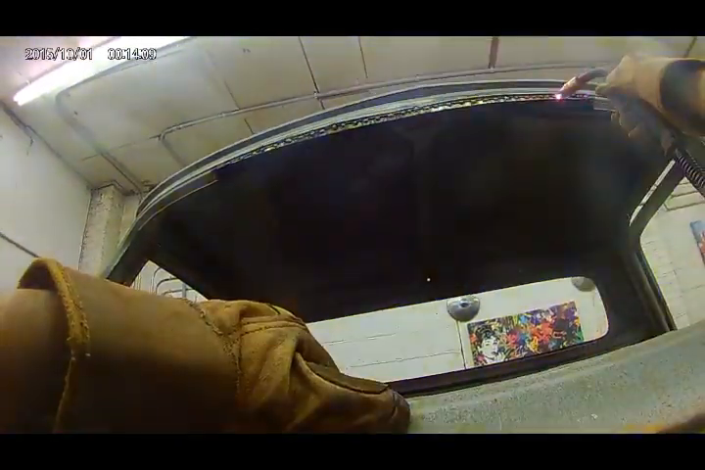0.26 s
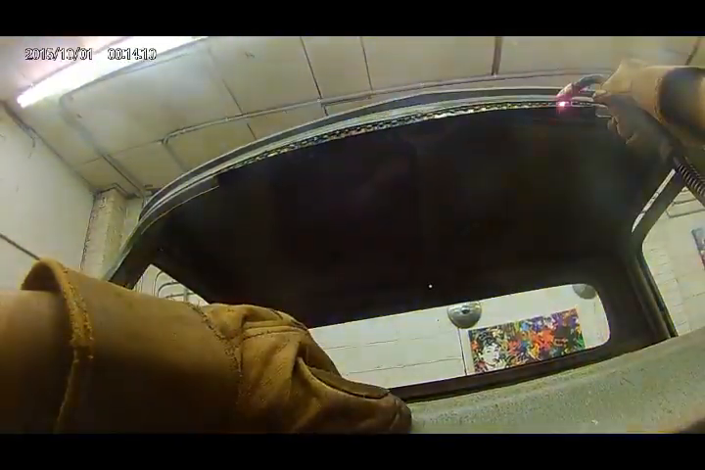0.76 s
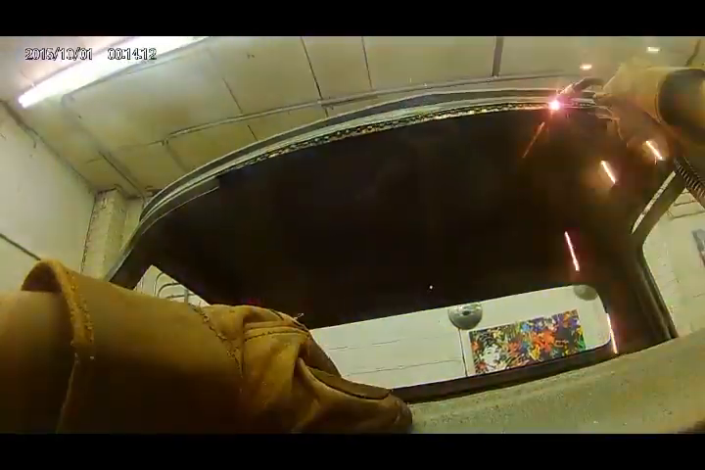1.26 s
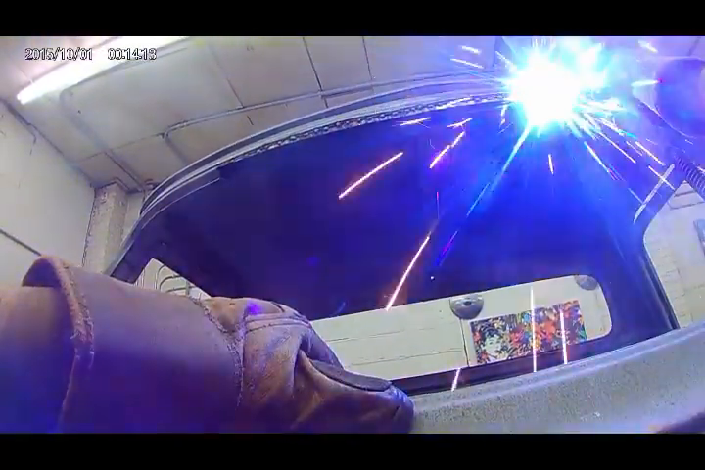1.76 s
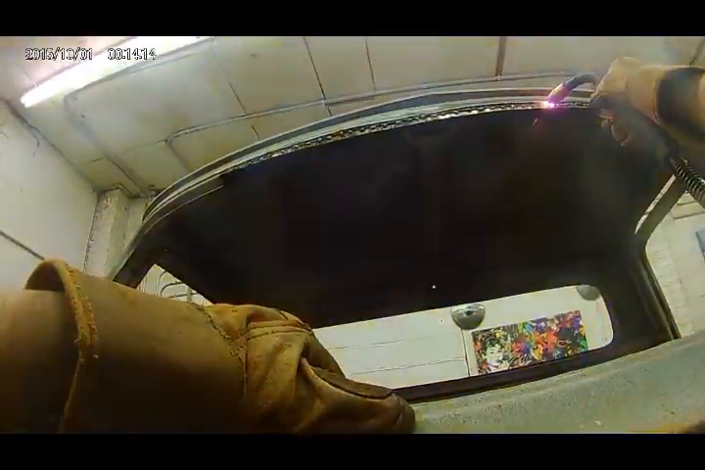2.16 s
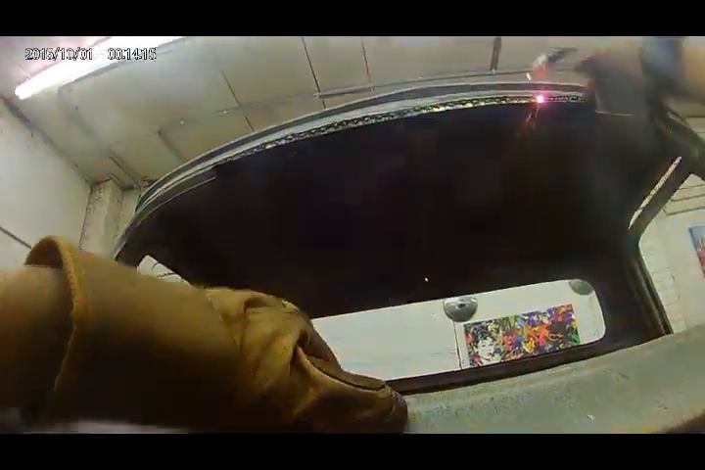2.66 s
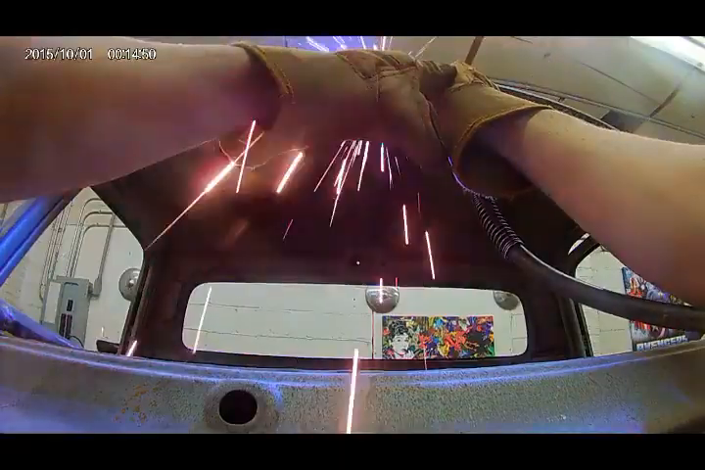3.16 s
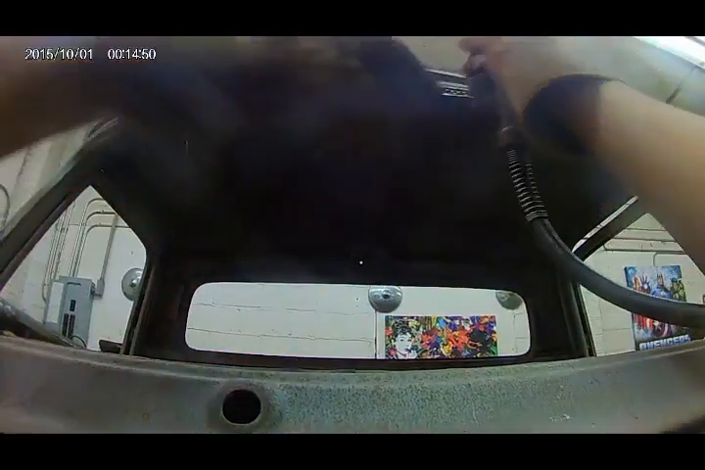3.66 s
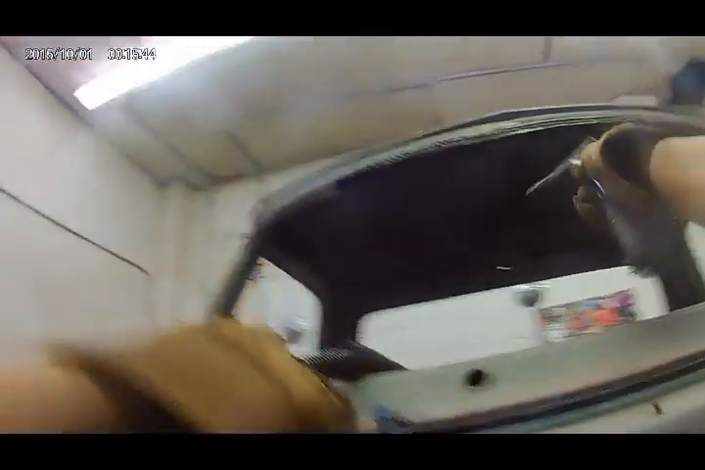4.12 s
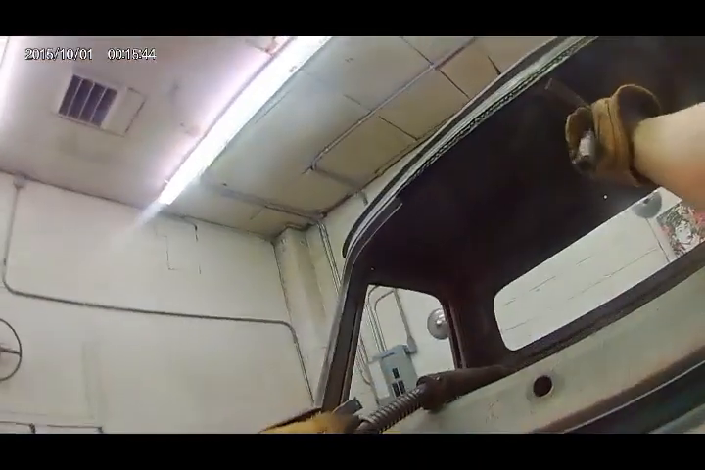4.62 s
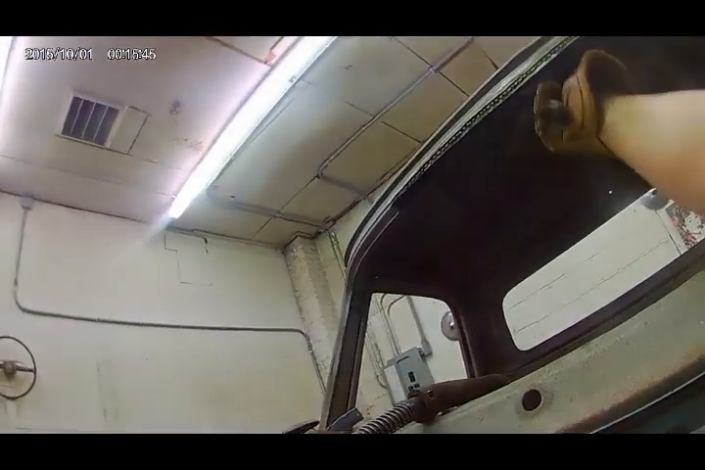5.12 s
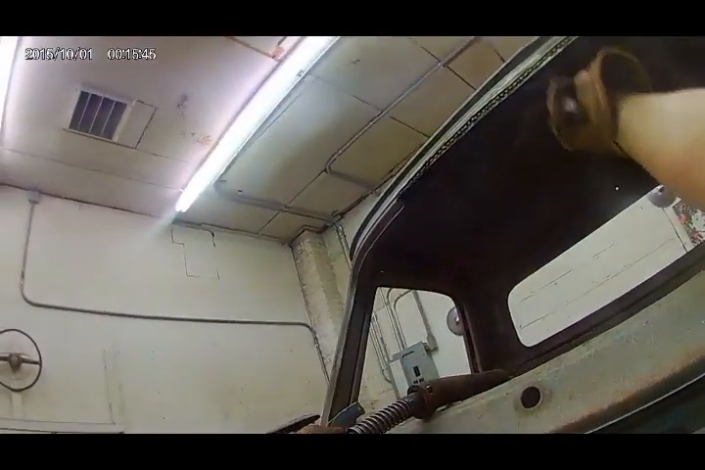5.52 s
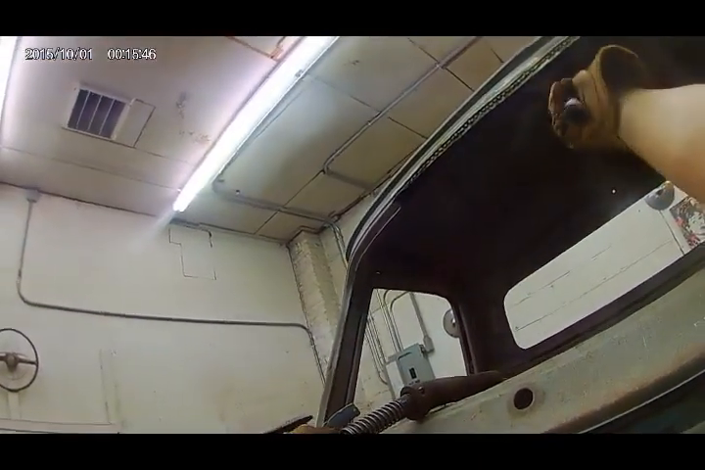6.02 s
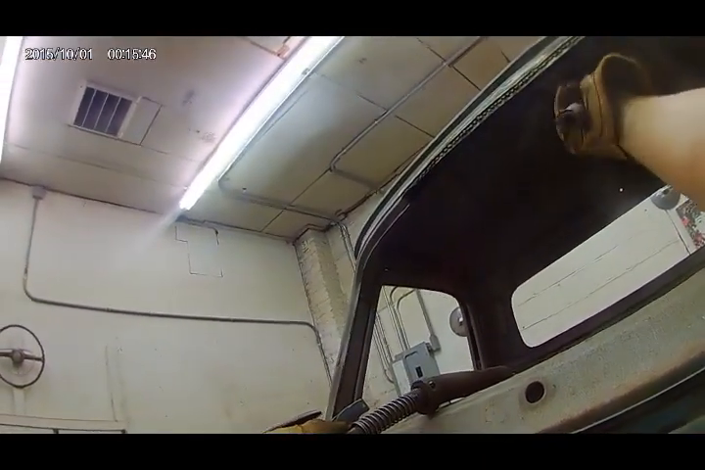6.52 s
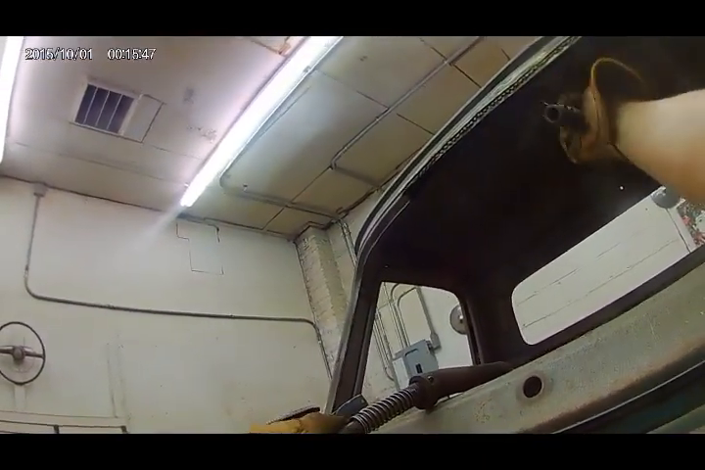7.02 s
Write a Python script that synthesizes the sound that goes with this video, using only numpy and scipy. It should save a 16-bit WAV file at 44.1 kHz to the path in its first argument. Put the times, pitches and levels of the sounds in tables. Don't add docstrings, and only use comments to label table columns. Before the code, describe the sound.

Heard close from a small boxed camera on a welder's helmet: five brief, harsh, sputtering arc bursts with sharp snaps, the last longest and loudest, broken by a hard metallic clank. Gloves then rub and knock the case. After a quiet pause, six steady hammer blows bang on sheet metal, growing stronger and echoing through a large hard-walled shop, over faint fan hum, hiss and thin electronic whine.

```python
import sys
import numpy as np
from scipy import signal
from scipy.fft import rfft, irfft
from scipy.io import wavfile
from scipy.ndimage import uniform_filter1d

SR = 44100
rng = np.random.default_rng(int(sys.argv[2]) if len(sys.argv) > 2 else 0)


def digitize_waveform(pressure):
    field = np.atleast_2d(pressure).T
    bounded = np.clip(field, -1, 1)
    quanta = np.round(bounded * 32767).astype(np.int16)
    wavfile.write(sys.argv[1], SR, quanta)


def natural_amplitude(level_db):
    exponent = np.asarray(level_db, float) / 20
    return 10 ** exponent


N = 321048
T = np.arange(N) / SR
LEAN_S = 2.7
BRIGHT_S = 3.4

# start_s, length_s, sizzle_db, quench_t60_s, afterglow_t60_s
ARC_SPELLS = [
    (0.3, 0.22, -33, 0.092, 0.42),
    (0.896, 0.018, -43, 0.15, 0.23),
    (0.985, 0.032, -44, 0.084, 0.27),
    (1.076, 0.11, -36, 0.13, 0.42),
    (1.639, 0.18, -46, 0.18, 0.8),
    (2.269, 0.2, -49, 0.11, 0.6),
    (2.769, 0.35, -33, 0.61, 1.35),
]
# start_s,
# snap_db, flare_db, flare_half_length_ms
WIRE_SHORTS = [(0.3177, -15.5, -50, 5), (0.3303, -14, -44, 4.3), (0.343, -31, -22, 10),
               (0.3834, -13.5, -42, 5), (0.392, -17, -36, 7.1), (0.421, -17, -22, 13),
               (0.4606, -17.5, -23, 11), (0.491, -16, -21, 9), (0.533, -17, -35, 5), (.543, -26, -40, 4),
               (0.9776, -24, -45, 4), (0.919, -10.5, -14.5, 15), (.951, -7, -38, 5), (1.0132, -17, -24, 12),
               (1.043, -17.5, -44, 4.2), (1.0724, -14.5, -19, 17), (1.11, -16.5, -41, 8.4),
               (1.131, -16, -24, 5), (1.142, -21, -46, 5), (1.1526, -15.5, -30, 7.8),
               (1.164, -21, -36, 5.9), (1.1823, -12.5, -24, 13), (1.653, -48, -20.5, 7.5),
               (1.6906, -17.5, -22, 36), (1.7312, -12.5, -26, 4.2), (1.766, -13, -19, 15),
               (1.803, -17, -22, 10), (1.825, -17.5, -26, 23), (1.8612, -16.5, -19, 5.5),
               (1.8704, -16, -22.5, 18), (1.899, -17.5, -29, 6.5), (1.909, -19, -42, 5),
               (2.286, -35, -25, 11), (2.3015, -13.5, -41, 5), (2.335, -30, -25, 15), (2.373, -17, -23, 4.8),
              (2.3795, -29, -36, 4), (2.405, -8.5, -23, 12.5), (2.4358, -14, -17, 2.9),
              (2.4713, -11, -30, 12), (2.5007, -19, -46, 4.4), (2.5222, -17.5, -45, 6),
              (2.762, -21, -24, 7.2), (2.822, -16, -42, 5), (2.8317, -9.5, -19, 9.4),
              (2.8474, -15, -31, 5.5), (2.8537, -12, -34, 5), (2.8632, -12, -27, 9.1), (2.874, -15, -34, 5),
              (2.8876, -3, -21.5, 25), (2.9048, -14, -38, 5), (2.9487, -12, -10.5, 3), (2.969, -9, -24, 5),
              (2.981, -19, -17.5, 5.2), (3.001, -7.5, -20.5, 11), (3.0318, -15, -31, 11),
              (3.0547, -11, -19, 7.4), (3.065, -17, -26, 6), (3.089, -18, -32, 3.7), (3.103, -24, -52, 5.7),
              (3.131, -3, -16, 4.8)]
# start_s, peak_db, low_share_db
SPATTER_HITS = [
    (0.6883, -51, -7),
    (1.4102, -43, -5),
    (1.4471, -44, 25),
    (1.5618, -45, -14),
    (4.6114, -40, -12),
]
# pitch_hz, width_hz, level_db
FLOOR_PAN_RINGS = [(4400, 250, 11), (6200, 150, 18.5)]
# pitch_hz, density_db_per_hz
ARC_SIDE_SPECTRUM = [(200, -18.5), (400, -17), (1100, -19.5), (1400, -2), (1750, -5), (2300, -10.5),
                     (2900, -23)]
# pitch_hz, density_db_per_hz
ARC_AHEAD_SPECTRUM = [(90, -79), (205, 6.5), (320, -9.5), (480, -16.5), (730, -5), (1150, -9), (1400, 4.5),
                      (2280, -5), (2750, -17)]
# pitch_hz, density_db_per_hz
RIM_SIDE_SPECTRUM = [(3500, -8), (4150, -4), (4600, -14), (5300, -4), (6000, -8), (6370, -3), (6800, -15),
                     (8800, -16), (9850, -5), (10600, -13), (11350, 1), (12600, -6), (13900, -21),
                     (14800, -14), (16000, -24)]
# pitch_hz, density_db_per_hz
RIM_AHEAD_SPECTRUM = [(1940, -37), (3300, -7), (3570, -12), (4050, 0), (4380, -3), (5170, -1), (5710, -8),
                      (6920, -11), (7790, -7), (8770, -14), (10100, -10), (11800, 1), (12900, -14),
                      (16000, -24)]
# pitch_hz, t60_s
CAB_DECAYS = [(500, 0.55), (2000, 0.27), (6000, 0.16), (14000, 0.011)]

# peak_s, force_db, rise_db_per_s, fall_db_per_s, drag_db
TORCH_CONTACTS = [
    (1.3, -3, 2800, 2800, -34),
    (2.727, -15.5, 1000, 1250, -47),
]
# pitch_hz, level_db, t60_s
CLANK_SHEET_MODES = [(437, -17, .3), (584, -22, .3), (680, -4, .28), (820, -12, .2), (965, -13, .08),
                     (1061, -18, .3), (1367, -3, .16), (1400, -4, .16), (1550, -6, .14), (1602, -9, .22),
                     (1700, -8, .22), (1790, -6, .1), (2140, -12, .09), (2445, -3, .08)]
# pitch_hz, level_db, t60_s
KNOCK_SHEET_MODES = [(108, -22, 1.8), (674, 9, 0.088), (780, 26, 0.065), (1030, 21, 0.05), (1570, 14, 0.08),
                     (4450, 2, 0.05)]
# pitch_hz, density_db_per_hz
CLANK_SPECTRUM = [(120, -54), (200, -31), (529, -11.5), (671, 2.5), (1100, -15), (1400, 7), (1770, -1.5),
                  (2050, -7), (2420, -7), (3020, -15.5), (6170, -23.5), (16000, -44)]
# pitch_hz, density_db_per_hz
KNOCK_SPECTRUM = [(47, -41), (80, -6), (422, -13), (1000, -1), (1280, -12), (1530, -4.5), (2220, -14),
                  (2970, -26.5), (4420, -12.5), (5280, -28), (12300, -37), (16000, -56)]

# start_s, strength_db, treble_db, bass_db
HAMMER_BLOWS = [
    (5.009, -14, 1, 7),
    (5.384, -9.5, 1.5, 6.5),
    (5.807, -7, -0.5, 6.5),
    (6.236, -6.5, -0.5, 7),
    (6.683, -5.5, 0, 5.5),
    (7.148, -6, -1, 5.5),
]
# start_s, peak_db, low_share_db
HAMMER_BOUNCES = [
    (5.016, -13.5, -0.5),
    (5.0444, -31, -20),
    (5.39, -9, -0.5),
    (5.458, -17.5, 5.5),
    (5.482, -17.5, 6),
    (5.5755, -20, -24),
    (5.624, -22, -22),
    (5.728, -25.5, -20),
    (6.721, -8, -18),
    (7.179, -6, -20),
]
# start_s, peak_db, pitch_hz
HAMMER_GLINTS = [(5.0102, -22, 11400), (5.0128, -23, 9700), (5.0228, -29, 4170), (5.049, -29, 5060),
                 (5.3835, -18, 11400), (5.3865, -17, 9500), (5.391, -12, 5000), (5.8068, -18, 11600),
                 (5.8098, -17, 9500), (5.814, -12, 4970), (5.819, -19, 4000), (6.2353, -20, 11400),
                 (6.239, -18, 9500), (6.243, -12, 4900), (6.262, -16, 4400), (6.685, -20, 11500),
                 (6.6825, -32, 4200), (6.6915, -13, 5050), (6.72, -11, 5100), (6.73, -12, 4500),
                 (7.148, -19, 11400), (7.1485, -21, 9800), (7.184, -10, 4800)]
# pitch_hz, density_db_per_hz
PANEL_SPECTRUM = [(15, -12), (25, -29.5), (161, -14.5), (200, -18.5), (344, -9.5), (427, -9), (695, -9.5),
                  (1190, -4.5), (1400, 4.5), (1520, -4), (2050, -7), (2690, -26.5), (4140, -25.5),
                  (11600, -47.5), (16000, -63)]
# pitch_hz, width_hz, level_db
PANEL_RESONANCES = [(210.5, 13.7, 13.5), (407, 20, -4.5), (420, 7.1, 4), (827.5, 4, 6), (1388, 85, 3.5),
                    (1970, 9.9, 3), (1680, 18, -1)]
# pitch_hz, width_hz, level_db
HOUSING_RESONANCES = [(4160, 230, 5.5), (6390, 79, 9), (10800, 170, -15), (12100, 1600, 14.5)]
# pitch_hz, t60_s
SHOP_DECAYS = [(60, 3.2), (160, 1.98), (420, 1.82), (1100, 1.15), (2910, 1.22), (7680, 1)]
# delay_s, level_db
WALL_ECHOES = [(0.028, -20), (0.045, -7), (0.074, -14), (.098, -14), (.124, -38)]
# start_s, length_s
TREBLE_GAPS = [
    (4.995, .011),
    (5.372, .009),
    (5.79, .012),
    (6.672, .009),
    (7.136, .007),
]

# start_s, hold_s, rumble_db, rustle_db, fall_t60_s
CASE_RUBS = [
    (.63, .005, -36.5, -42.5, 0.2),
    (3.422, 0.36, -43.5, -54.5, .1),
    (3.434, 0.016, -46, -32.5, .035),
    (3.563, .004, -57, -38, 0.19),
    (3.62, 0.092, -67, -38, 0.037),
    (3.708, 0.19, -26.5, -33.5, 0.019),
    (3.767, 0.0036, -15.5, -15.5, 0.062),
    (3.791, 0.021, -20, -31.5, 0.049),
    (3.856, 0.0042, -39, -38, 0.091),
    (4.618, 0.0081, -67, -36.5, 0.54),
]
# pitch_hz, density_db_per_hz
RUMBLE_SPECTRUM = [(12, -40), (20, -23), (228, 3.5), (303, -11.5), (365, 0.5), (451, -7.5), (535, -7),
                   (600, -23), (780, -39), (1320, -120)]
# pitch_hz, density_db_per_hz
RUSTLE_SPECTRUM = [(240, -10), (400, 0.5), (949, -4.5), (1040, -1), (1640, -4), (2220, -6), (3050, -31),
                   (3290, -16), (5860, -35.5), (10000, -38), (11700, -30), (13000, -48), (16000, -58)]
# start_s, peak_db, pitch_hz, t60_s, treble_db
CASE_TICKS = [(3.419, -30.5, 1940, 0.017, 11), (3.704, -0.5, 1830, 0.0099, -0.5),
              (3.757, -23.5, 2200, 0.056, 18.5), (3.82, -3.5, 1050, 0.038, -31),
              (3.875, -37, 1500, 0.041, -11), (3.895, -32, 1980, 0.0054, 21),
              (4.198, -25, 1500, 0.017, 18.5), (3.492, -39, 2110, .02, 5), (3.7235, -17, 2120, .04, 1),
              (3.7645, -8, 2200, 0.023, -2), (3.781, -9, 2120, 0.018, 0), (3.8, -14, 2210, 0.032, -2),
              (3.851, -27, 2190, .04, 0)]
# start_s, peak_db, pitch_hz, t60_s
CASE_THUDS = [
    (.622, -33, 108, 0.35),
    (2.728, -26, 108, 0.12),
    (3.433, -28, 68.5, 0.22),
    (3.563, -27, 560, 0.089),
    (3.703, -22, 218, 0.11),
    (3.821, -3, 231, 0.048),
    (3.876, -6, 108, 0.048),
]
# pitch_hz, density_db_per_hz
TICK_SPECTRUM = [(290, -37), (500, 11), (1960, 6), (2840, -6.5), (4350, -7.5), (6300, -28), (8500, -31),
                 (11700, -26), (15000, -45)]

# pitch_hz, density_db_per_hz
AIR_SPECTRUM = [(12, -50), (20, -17), (107, -16.5), (175, -20.5), (207, -10), (319, -21.5), (393, -3),
                (445, -27.5), (1150, -25.5), (1420, -23), (2200, -27.5), (2800, -44), (3640, -96)]
# pitch_hz, width_hz, level_db
FAN_WHISTLES = [(223, 27, -70), (405, 36, -55), (708, 93, -58), (1390, 140, -51.5)]
# pitch_hz, density_db_per_hz
HISS_SPECTRUM = [(1650, -50), (2800, -14), (3170, -6.5), (3560, -12), (3830, -4), (4950, -14.5),
                 (6720, -17.5), (6870, -13.5), (9960, -18.5), (11400, -9.5), (13000, -12), (13900, -12),
                 (14700, -15), (16000, -17)]
# pitch_hz, level_db
ELECTRONIC_WHINES = [(7117, -84), (12430, -71.5), (13329, -75.5), (13749, -71), (14217, -69.5)]


def arc():
    swell_db_per_s, strike_s, glow_db, glow_low_db = 5, 0.023, -44.5, 13
    flare_lag = 0.7
    flicker = natural_amplitude(1.97 * evened(uniform_filter1d(rng.standard_normal(N), size=200)))
    ahead = T > LEAN_S
    power, glow = np.zeros(N), np.zeros(N)
    for s, length, db, quench, t60 in ARC_SPELLS:
        swell_db = swell_db_per_s * np.clip(T - s, 0, length)
        power += natural_amplitude(db + swell_db) * stroke(s, length, strike_s, quench)
        glow += natural_amplitude(glow_db) * stroke(s + length, 0, quench, t60)
    crackle = natural_amplitude(-27) * grit(250, 2.4) * power

    relights = WIRE_SHORTS
    for s, _, flare_db, half_ms in relights:
        half = max(half_ms, 3) / 1000
        near = slice(int((s - .05) * SR), int((s + .08) * SR))
        power[near] += natural_amplitude(flare_db - 8.5) * np.exp(-((T[near] - s - flare_lag * half) / half) ** 2)
    fry = grit(20000, .8) * flicker
    flaring = split(fry, natural_amplitude(3.5 + 0.5 * ahead)) * power
    afterglow = split(fry, natural_amplitude(glow_low_db)) * glow

    pops = [(s, db, 1.5 - 6 * (s > LEAN_S)) for s, db, _, _ in relights]
    bridge_bursts = natural_amplitude(13.5) * snaps(pops, 0.00055)
    spatter = natural_amplitude(10.5) * lift(snaps(SPATTER_HITS, 0.0021), FLOOR_PAN_RINGS)
    drive = natural_amplitude(-4) * (flaring + afterglow) + crackle + bridge_bursts + spatter
    drive = drive + natural_amplitude(-12) * signal.oaconvolve(drive, room(CAB_DECAYS, .4))[:N]
    from_side = colour(drive * ~ahead, ARC_SIDE_SPECTRUM + RIM_SIDE_SPECTRUM)
    from_ahead = colour(drive * ahead, ARC_AHEAD_SPECTRUM + RIM_AHEAD_SPECTRUM[1:])
    return from_side + from_ahead


def torch_contact(contact, modes, noise_spectrum, ring_db, longest_t60, spread):
    s, force_db, rise, fall, drag_db = contact
    t = T[:SR // 2]
    impact = stroke(s, 0, 60 / rise, 60 / fall)
    shoulder = natural_amplitude(-9) * stroke(s, 0.0049, 0.055, 0.057)
    push = natural_amplitude(force_db) * (impact + shoulder) * step(s - 0.025, .005)
    drag = natural_amplitude(drag_db) * stroke(s, 0, .01, 60 / 161)
    force = grit(8000, 0.12) * (push + drag)

    ring = np.zeros(len(t))
    for hz, db, t60 in modes:
        for detune in rng.normal(1, spread, size=4):
            ring += natural_amplitude(db - 60 * t / min(t60, longest_t60)) * np.sin(2 * np.pi * hz * detune * t)
    ringing = natural_amplitude(ring_db) * signal.oaconvolve(force, ring / np.linalg.norm(ring))[:N]
    in_cab = force + 0.17 * signal.oaconvolve(force, room(CAB_DECAYS, .4))[:N]
    return ringing + natural_amplitude(-1.0) * colour(in_cab, noise_spectrum)


def clanks():
    clank, knock = TORCH_CONTACTS
    return (torch_contact(clank, CLANK_SHEET_MODES, CLANK_SPECTRUM, -4, .35, .005)
            + torch_contact(knock, KNOCK_SHEET_MODES, KNOCK_SPECTRUM, -9, .2, .015))


def blow_tail(common, grain, treble_db, bass_db):
    tail = 0.88 * common + 1.126 * room(SHOP_DECAYS, 1.2)
    t = T[:len(tail)]
    slaps = sum(natural_amplitude(db) * np.exp(-abs(t - s) / 0.0085) for s, db in WALL_ECHOES)
    tail = tail * (1 + 1.11 * slaps + 0.24 * np.exp(-t / 0.00072))
    tail = tail * (1 - 0.43 * np.exp(-((t - .0045) / .0025) ** 2))
    crack = natural_amplitude(treble_db) * (1 + 2.95 * np.exp(-t / 0.015) + .5 * np.sqrt(abs(grain)))
    tail = crack * split(tail, 1 / crack)
    bass = signal.sosfilt(signal.butter(2, 500, fs=SR, output="sos"), tail)
    return tail + bass * (natural_amplitude(bass_db) * (1 - np.exp(-t / 0.007)) - 1)


def hammer():
    out = np.zeros(N + 2 * SR)
    common = room(SHOP_DECAYS, 1.2)
    size = len(common)
    grain = uniform_filter1d(grit(340, 2.9)[:size] ** 2, size=60) * np.exp(-T[:size] / 0.021)
    for s, db, treble_db, bass_db in HAMMER_BLOWS:
        tail = blow_tail(common, grain, treble_db, bass_db)
        out[int(s * SR):][:len(tail)] += natural_amplitude(db + 26.0) * tail
    out = out[:N] + natural_amplitude(22.5) * snaps(HAMMER_BOUNCES, 0.0014)
    out = lift(colour(out, PANEL_SPECTRUM), HOUSING_RESONANCES)
    out = out + sum(natural_amplitude(db - 4.5) * resonate(out, hz, width) for hz, width, db in PANEL_RESONANCES)

    t = T[:300]
    u = t / 0.00036
    for s, db, hz in HAMMER_GLINTS:
        out[int(s * SR):][:300] += natural_amplitude(db) * u * np.exp(1 - u) * np.sin(2 * np.pi * hz * t)
    return out


def handling():
    rise_s, rumble_linger = 0.077, 1.65
    low = sum(natural_amplitude(db) * stroke(s, hold, rise_s, rumble_linger * fall) for s, hold, db, _, fall in CASE_RUBS)
    high = sum(natural_amplitude(db) * stroke(s, hold, rise_s, fall) for s, hold, _, db, fall in CASE_RUBS)
    rustle = colour(grit(5000, 1.0), RUSTLE_SPECTRUM) * high
    rumble = colour(grit(900, 2.6), RUMBLE_SPECTRUM) * low
    answer = natural_amplitude(-14.5) * signal.oaconvolve(rustle, room(SHOP_DECAYS, 0.89))[:N]
    beads = evened(resonate(resonate(grit(6000, 1.2), 4000, 2000.0), 4000, 2000.0))
    shower = natural_amplitude(-50.5) * beads * stroke(3.46, .1, 0.94, .15)
    out = rustle + answer + rumble + shower
    add_knocks(out, CASE_TICKS, .7)
    add_knocks(out, [row + (0,) for row in CASE_THUDS], .05)
    return out


def add_knocks(out, rows, noisy):
    t = T[:8000]
    for s, db, hz, t60, treble_db in rows:
        tone = np.sin(2 * np.pi * hz * t)
        contact = colour(rng.standard_normal(8000), TICK_SPECTRUM)
        body = (1 - noisy) * tone + noisy * contact
        body = natural_amplitude(treble_db) * split(body, natural_amplitude(-treble_db))
        out[int(s * SR):][:8000] += body * natural_amplitude(db - 60 * t / max(t60, .004))


def hum():
    air = natural_amplitude(-45.5) * colour(rng.standard_normal(N), AIR_SPECTRUM)
    for hz, width, db in FAN_WHISTLES:
        air += natural_amplitude(db) * evened(resonate(resonate(rng.standard_normal(N), hz, width), hz, width))
    air *= natural_amplitude(-1.5 + 7 * step(LEAN_S + 0.13, 0.075) - 4.5 * step(LEAN_S + 0.83, 0.29))

    throb_db = 2.75 * evened(resonate(rng.standard_normal(N), 85.0, 50.)) * (1 + 0.79 * step(BRIGHT_S, .5))
    hiss = colour(rng.standard_normal(N), HISS_SPECTRUM)
    hiss = natural_amplitude(throb_db) * split(hiss, natural_amplitude(-throb_db), 6500)
    air += natural_amplitude(-62 + 4 * step(3.9, 0.14)) * hiss

    bright = step(BRIGHT_S, .3)
    readout = np.tanh(2 * np.cos(2 * np.pi * 30.035 * T - 3.39))
    duty = 1 + .55 * bright * readout
    for hz, db in ELECTRONIC_WHINES:
        wander = np.cumsum(rng.standard_normal(N) * (.035 - .017 * bright))
        pulse = duty if hz > 13000 else 1
        air += natural_amplitude(db + 3 * bright) * pulse * np.cos(2 * np.pi * hz * T + wander)
    return air


def snaps(rows, rise):
    out, t = np.zeros(N), T[:512]
    for s, db, low_db in rows:
        z = rfft(rng.standard_normal(512) * t * np.exp(-t / rise))
        snap = irfft(z / (abs(z) + .2 * abs(z).mean()))
        out[int(s * SR):][:512] += split(snap / np.linalg.norm(snap), natural_amplitude(low_db)) * natural_amplitude(db)
    return out


def grit(per_s, spread_db):
    size = natural_amplitude(spread_db * np.minimum(rng.exponential(1, N), 5)) * (rng.random(N) < per_s / SR)
    return evened(size * rng.standard_normal(N))


def room(decays, seconds):
    hz, t, z = signal.stft(rng.standard_normal(int(seconds * SR)), SR, nperseg=256)
    t60 = np.maximum(read(decays, hz), .02)[:, None]
    tail = signal.istft(z * natural_amplitude(-60 * t / t60), SR, nperseg=256)[1]
    return tail / np.linalg.norm(tail)


def resonate(x, hz, width):
    r = np.exp(-np.pi * width / SR)
    return 2 * signal.lfilter([1 - r], [1, -r * np.exp(2j * np.pi * hz / SR)], x).real


def lift(x, bands):
    return x + sum((natural_amplitude(db) - 1) * resonate(x, hz, width) for hz, width, db in bands)


def colour(x, points):
    log_gain = np.log(natural_amplitude(np.maximum(read(points, abs(np.fft.fftfreq(4096, 1 / SR))), -100)))
    taps = np.fft.ifft(np.exp(np.conj(signal.hilbert(log_gain)))).real[:2048]
    return signal.oaconvolve(x, taps / np.linalg.norm(taps))[:len(x)]


def split(x, low_gain, hz=2800):
    low = signal.sosfiltfilt(signal.butter(2, hz, fs=SR, output="sos"), x)
    return x + (low_gain - 1) * low


def read(points, hz):
    f, value = np.transpose(points)
    return np.interp(np.log(hz + 1), np.log(f + 1), value)


def evened(x):
    return x / np.sqrt(np.mean(x ** 2) + 1e-20)


def stroke(start, hold, rise, fall):
    before = np.maximum((start - T) / max(rise, .002), 0)
    after = np.maximum((T - start - hold) / max(fall, .002), 0)
    return natural_amplitude(np.maximum(-60 * before - 60 * after, -200))


def step(s, width):
    return .5 + .5 * np.tanh((T - s) / width)


def scene():
    return (arc() + clanks() + hammer() + handling() + hum())[None]


def roll_off(x):
    return signal.sosfilt(signal.butter(12, 16430, fs=SR, output="sos"), x)


def record(dry):
    cut = dry - dry / (1 + abs(dry / .88) ** 10) ** (1 / 10)
    held = dry - split(split(cut, 0, 250), 0, 250)
    gaps = sum((T > s) * (T < s + length) * 1. for s, length in TREBLE_GAPS)
    shut = uniform_filter1d(gaps, size=60)
    held = held - shut * split(split(held, 0, 4000), 0, 4000)
    held = signal.oaconvolve(held, signal.firwin(301, 15750, fs=SR)[None], "same")
    return roll_off(held)


dry = scene()
out = record(dry)
digitize_waveform(out)
```